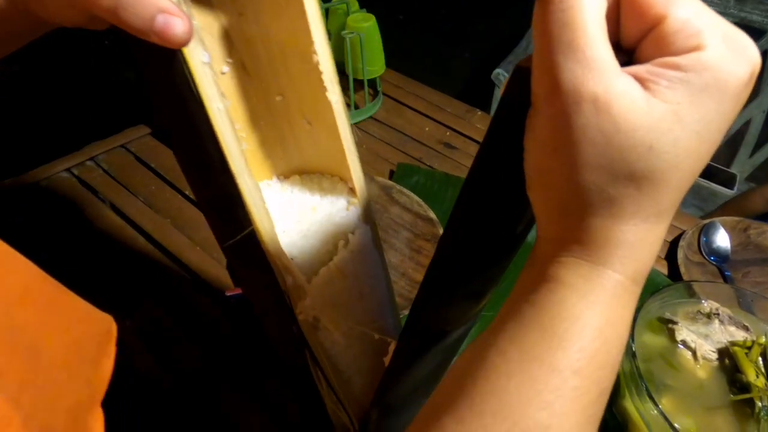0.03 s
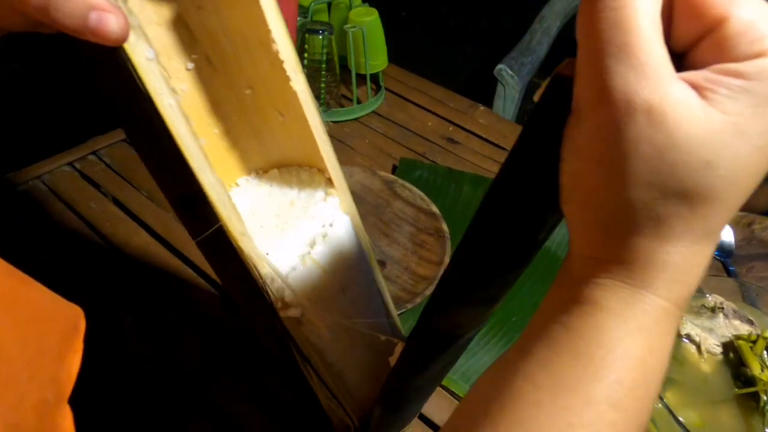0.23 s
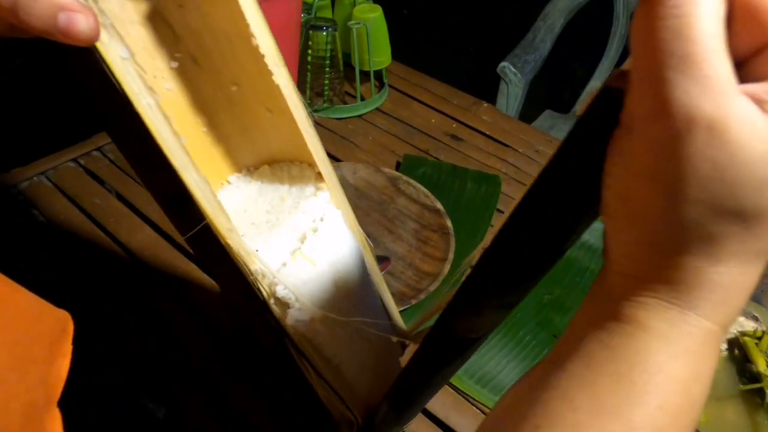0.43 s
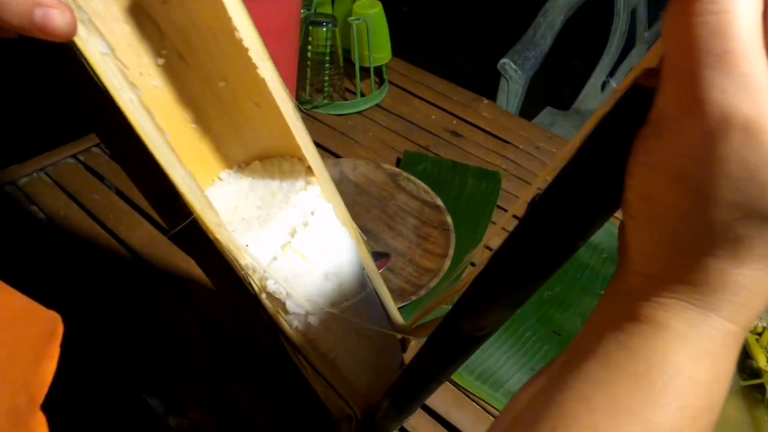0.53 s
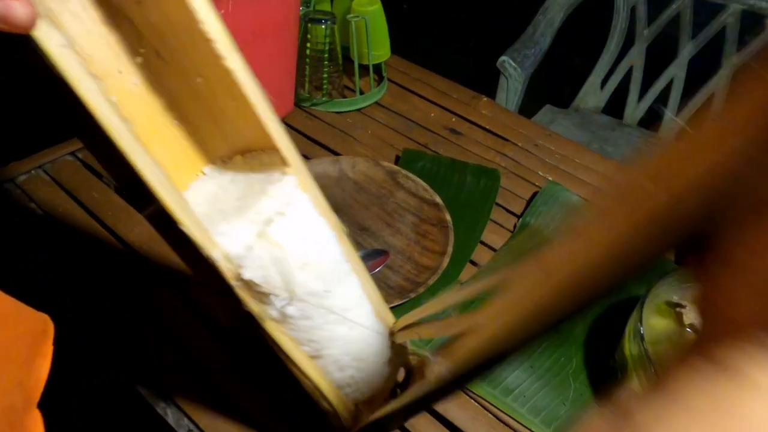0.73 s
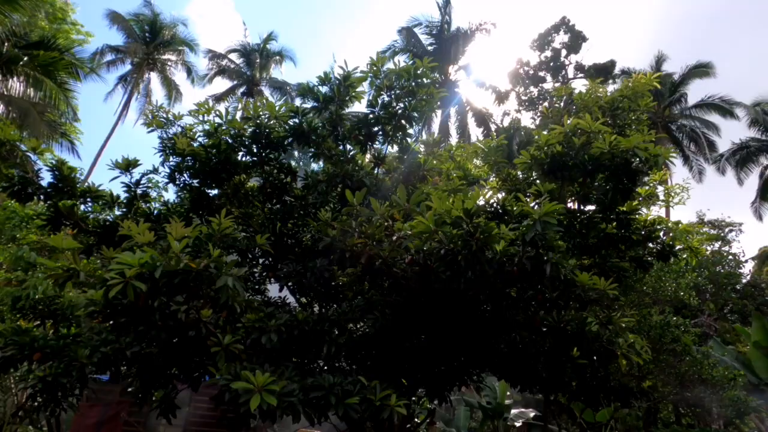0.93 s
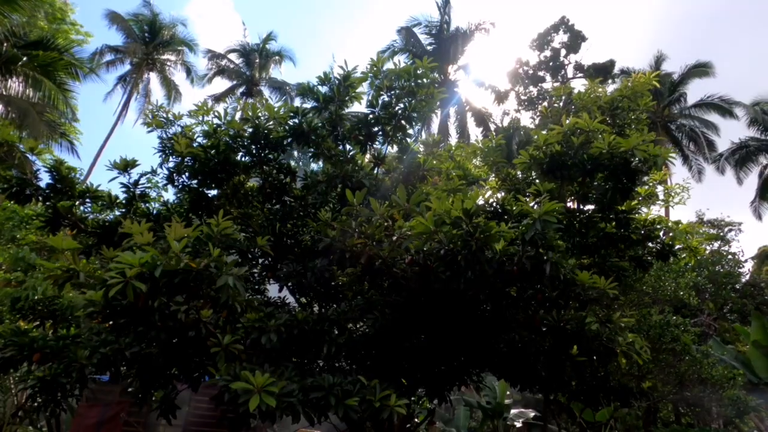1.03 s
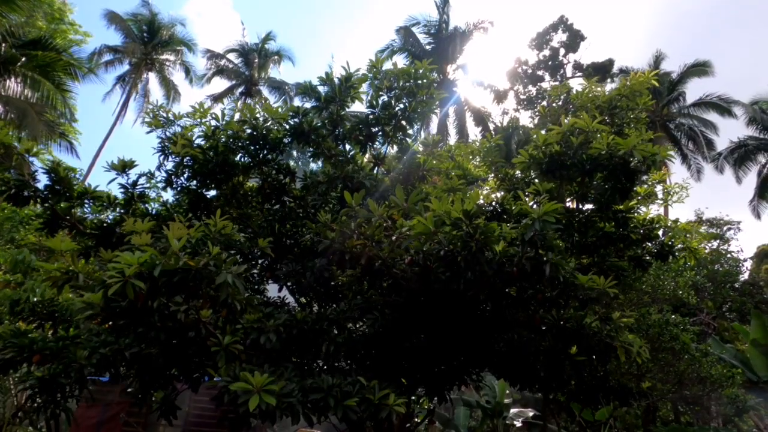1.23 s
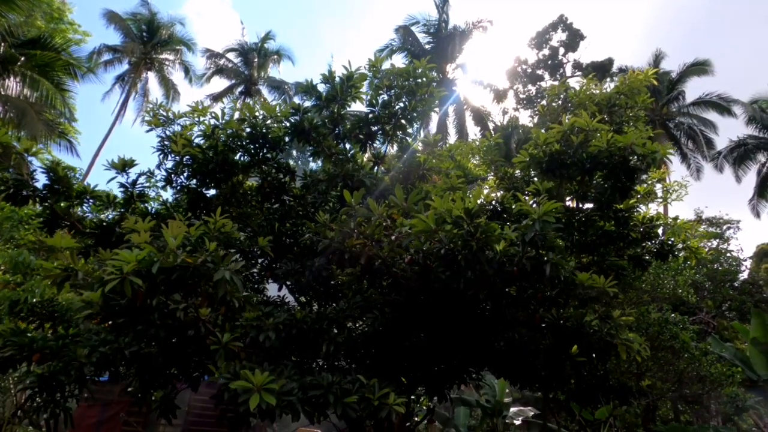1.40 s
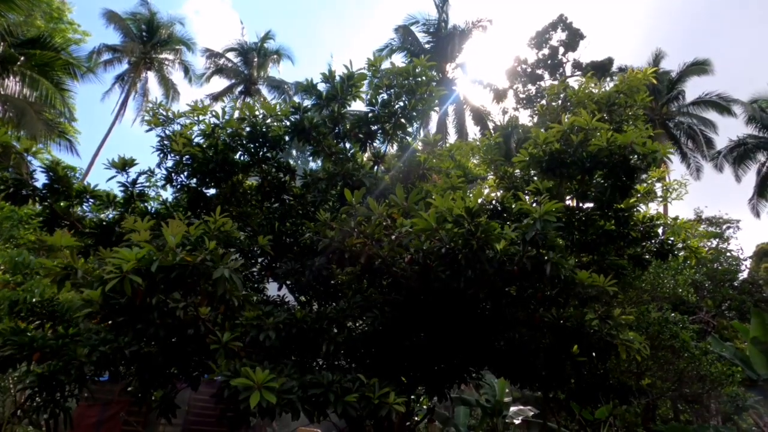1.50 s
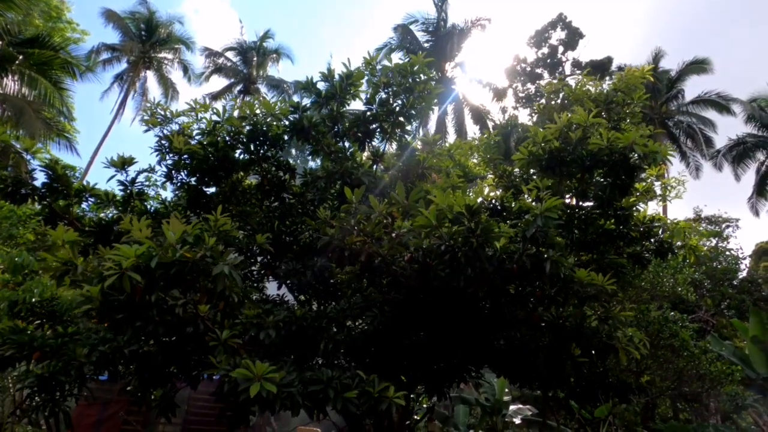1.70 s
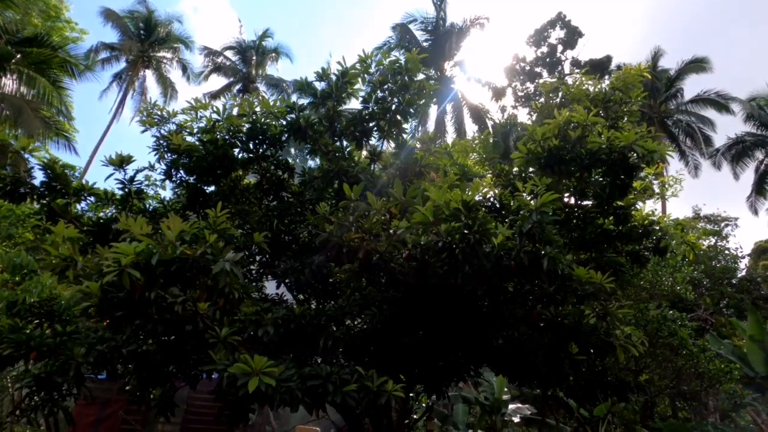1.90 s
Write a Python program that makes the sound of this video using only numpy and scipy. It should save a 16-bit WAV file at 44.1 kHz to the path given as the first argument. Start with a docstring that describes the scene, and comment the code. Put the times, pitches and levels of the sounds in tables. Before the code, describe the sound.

A bamboo tube is pulled open close to the microphone, crackling and splitting sharply until it gives with a dull knock, over insects and a distant motor hum. Then, in a quiet garden, a bird whistles and chirps twice.

```python
"""A garden table, close up: a bamboo tube is pulled open by hand. Fibres crackle, the wall splits in sharp
cracks that ring the tube, and it gives way with a dull knock, over insects and a distant motor hum.
The scene cuts to a quiet garden with light wind on the microphone. One bird nearby whistles and gives
two falling chirps, while a smaller one keeps chipping farther off in the trees."""
import sys
import numpy as np
from scipy import signal
from scipy.fft import rfft, irfft
from scipy.io import wavfile
from scipy.ndimage import uniform_filter1d

SR = 44100
rng = np.random.default_rng(int(sys.argv[2]) if len(sys.argv) > 2 else 0)


def wav_out(sig):
    """Save sig, one row per channel (or a flat mono array), as 16-bit PCM at SR to the path in sys.argv[1]."""
    wavfile.write(sys.argv[1], SR, np.round(np.clip(np.atleast_2d(sig).T, -1, 1) * 32767).astype(np.int16))


N = 85995

# air around the table: frequency_hz, relative_db
TABLE_AIR_COLOUR = [(20, 0), (60, 2), (160, 0), (300, -14), (800, -25), (2700, -25.5), (6000, -30.5),
                    (16000, -47.5)]
# distant motor: pitch_hz, level_db
MOTOR_TONES = [(58.5, -41.5), (115.5, -44.5)]
# insect chorus: pitch_hz, width_hz, level_db
INSECT_BANDS = [(3500, 150, -46.5), (5020, 175, -46.5), (7130, 250, -57)]
# air of the quiet garden: frequency_hz, relative_db
GARDEN_AIR_COLOUR = [(35, 6), (90, 1.5), (200, -13), (420, -22.5), (900, -16), (3500, -22), (8400, -35)]
# that air fading in: time_s, level_db
GARDEN_FADE = [(.978, -83), (1.22, -60.5), (1.45, -55), (1.8, -53)]
# faint hum in the garden: pitch_hz, level_db
GARDEN_TONES = [(180, -79)]
# small bird farther off: start_s, level_db, following_pip_hz
FAR_CHIPS = [(1.246, -59, 5730), (1.372, -59.5, 5900), (1.48, -56, 5730), (1.574, -45, 5930),
             (1.696, -46.5, 5700), (1.807, -42.5, 5780), (1.934, -39, 5500)]
# thin glides of other birds: start_s, length_s, from_hz, to_hz, level_db
FAR_GLIDES = [(1.342, 0.061, 3490, 2840, -60.5), (1.568, .1, 2540, 2970, -61.5),
              (1.894, 0.039, 5150, 5400, -52)]
# near bird's whistle: time_s, pitch_hz, level_db
WHISTLE_NOTE = [(1.41, 2720, -62.5), (1.44, 2570, -44), (1.466, 2554, -29), (1.494, 2516, -28.5),
                (1.508, 2555, -43), (1.526, 2518, -30.5), (1.57, 2556, -47.5), (1.64, 2480, -70)]
# its short lead-in note: time_s, pitch_hz, level_db
LEAD_IN_NOTE = [(1.668, 2425, -53), (1.678, 2455, -31), (1.685, 2370, -33.5), (1.69, 2630, -20),
                (1.694, 2655, -41.5), (1.703, 2490, -31.5), (1.714, 2480, -75.5)]
# its falling chirps: start_s, level_db
NEAR_CHIRPS = [(1.7058, -19), (1.756, -26.5)]
# chirp harmonics, from the second up: relative_db
CHIRP_HARMONICS = [-40, -32, -41.5]
# fine fibres tearing: time_s, level_db
TEAR_LEVEL = [(0, -65), (.22, -37.5), (.3, -44), (.36, -49.5), (.4, -33.5), (.47, -38), (.63, -45),
              (.66, -35.5), (.71, -30), (.76, -26), (.79, -32), (.832, -25.5), (.848, -43), (.9, -74)]
# colour of the fibres: frequency_hz, relative_db
FIBRE_COLOUR = [(60, -14.5), (300, -0.5), (2000, 0), (3300, 4), (5000, -2.5), (12000, -7.5), (16000, -22)]
# splits of the wall: time_s, level_db, bass_db, treble_db, splinter_hz
WALL_SPLITS = [(.079, -42.5, -2, -6, 1525), (.195, -39.5, -2, -2.5, 2010), (.215, -39.5, 0.5, -4, 1750),
               (0.233, -38, -10.5, 7, 2930), (0.2507, -34, -2, 2, 3130), (0.255, -29.5, 2.5, 7.5, 1010),
               (0.2925, -20, 1.5, -3, 2450), (0.3826, -29, -3.5, -7.5, 2720),
               (0.3911, -29.5, 2.5, 5.5, 2130), (0.3998, -28.5, -13, -1.5, 2510),
               (0.4128, -21.5, 6.5, 2, 2480), (0.4474, -33.5, 5, 7, 3130), (0.525, -39.5, -5.5, 6.5, 3590),
               (0.5511, -39, 3.5, 2.5, 3340), (0.604, -29.5, -9.5, 0.5, 3800), (.618, -37, -6, 1.5, 3800),
               (0.6415, -33.5, -6.5, 5, 3200), (.651, -28, -5, 3.5, 1710), (0.6923, -35.5, -2.5, -2, 3280),
               (.706, -27, -6, 2, 3800), (0.7215, -36, -1.5, 6.5, 2930), (0.7312, -27, -0.5, -1, 3680),
               (0.7341, -20, 3.5, 5.5, 1180), (0.7476, -23.5, 1.5, -1, 1970), (.765, -30, -8.5, -1.5, 4470),
               (0.77, -19, 1.5, -3.5, 1730), (.774, -25, 6, -11, 838), (0.806, -36, -5, 17.5, 3320),
               (.828, -36, 2.5, 7, 3306)]
# colour of a crack: frequency_hz, relative_db
WOOD_COLOUR = [(150, -19.5), (400, -4.5), (900, -1.5), (1400, 3.5), (2080, -9), (2650, 4.5), (3700, -1),
               (4800, -9.5), (8200, -7.5), (9200, -12.5), (16000, -31)]
# ring of the tube: pitch_hz, relative_db, t60_s
TUBE_MODES = [(438, -36.5, .07), (866, -33.5, 0.046), (2645, -28.5, 0.023), (3170, -34, 0.053),
              (3570, -32.5, .06)]
# stereo width of the bamboo: frequency_hz, side_db
BAMBOO_WIDTH = [(300, -18.5), (2500, -33.5), (6000, -15.5), (15000, -1)]

CUT_S, GARDEN_START_S = 0.9168, .978
GARDEN_TOP_HZ, BAND_LIMIT_HZ = 8490, 16300
GARDEN_T60_S, LEAVES_T60_S, TABLE_T60_S = 0.66, 0.1, 0.08
CHIP_TOP_HZ, CHIP_END_HZ, CHIP_S = 5600, 3900, .021
PIP_AFTER_S, PIP_S, PIP_RELATIVE_DB = 0.024, 0.023, -13
CHIRP_TOP_HZ, CHIRP_FLOOR_HZ, CHIRP_FALL_S, CHIRP_S = 3500, 1602, .0125, 0.026
FIBRES_PER_S, FIBRE_SPREAD_DB, FIBRE_CLUMP_DB = 7000, 2.5, 4.6
FIBRE_LOW_HZ, FIBRE_HIGH_HZ, FIBRE_DECAY_CYCLES = 250, 15000, 1.4
BASS_SHELF_HZ, TREBLE_SHELF_HZ = 1430, 4830
SPLINTER_DB, SPLINTER_OCTAVES = 9.5, 0.077


def amp(db):
    """Decibels to gain."""
    return 10 ** (np.asarray(db) / 20)


def unit_rms(x):
    """Scales to rms 1."""
    return x / np.sqrt(np.mean(x ** 2) + 1e-20)


def clock(size=N):
    """Time in seconds."""
    return np.arange(size) / SR


def curve(points):
    """Joins (time_s, value) points over the whole scene."""
    return np.interp(clock(), *np.transpose(points))


def colour_at(points, hz):
    """Joins (frequency_hz, value) points on a log axis."""
    f, value = np.transpose(points)
    return np.interp(np.log(hz + 1), np.log(f + 1), value)


def add(mix, start_s, sound):
    """Mixes a sound in at a time."""
    part = mix[max(round(start_s * SR), 0):][:len(sound)]
    part += sound[:len(part)]


def click(colour_db, size=1024):
    """A click with the given spectrum and no sound before its onset."""
    log_gain = np.log(amp(colour_db(abs(np.fft.fftfreq(size, 1 / SR)))))
    return np.fft.ifft(np.exp(np.conj(signal.hilbert(log_gain)))).real


def noise(colour_db):
    """Steady noise of the given spectrum, at rms 1."""
    gain = amp(colour_db(np.fft.rfftfreq(N, 1 / SR)))
    return unit_rms(irfft(rfft(rng.standard_normal(N)) * gain, N))


def wander(size):
    """Random drift of rms 1, smoothed over size samples."""
    return unit_rms(uniform_filter1d(rng.standard_normal(N), size))


def whitened(x, bins):
    """Evens out the spectrum, keeping only detail finer than the given bins."""
    spectrum = rfft(x)
    return irfft(spectrum / np.sqrt(uniform_filter1d(abs(spectrum) ** 2, bins)), len(x))


def tone(hz):
    """A pure voice of rms 1 that follows a pitch curve."""
    return np.sqrt(2) * np.sin(2 * np.pi * np.cumsum(hz) / SR)


def stereo(mid, side):
    """Left and right from mid and side."""
    return np.array([mid + side, mid - side])


def tail(x, t60_s, size=20000):
    """Diffuse reflections dying away."""
    t = clock(size)
    taps = rng.standard_normal(size) * amp(-60 * t / t60_s) * (t > .003)
    return signal.fftconvolve(x, taps / np.linalg.norm(taps))[:N]


def hum(tones):
    """Steady low tones."""
    return sum(np.sqrt(2) * amp(db) * np.sin(2 * np.pi * (hz * clock() + rng.random()))
               for hz, db in tones)


def air_push(start_s, db, hz, rise_s, decay_s):
    """A low, toneless push of air."""
    t = np.maximum(clock() - start_s, 0)
    envelope = np.minimum(t / rise_s, 1) * np.exp(-np.maximum(t - rise_s, 0) / decay_s)
    return amp(db) * envelope * noise(lambda f: -10 * np.log10(1 + (f / hz - hz / (f + 1)) ** 4))


def insects(drift_hz=90):
    """A chorus of narrow noise bands, each wandering in pitch."""
    chorus = np.zeros(N)
    for hz, width_hz, db in INSECT_BANDS:
        carrier = tone(hz + drift_hz * wander(size=3000))
        chorus += amp(db) * carrier * noise(lambda f: -20 * np.log10(1 + (f / width_hz) ** 2 / 2))
    return chorus


def table_ambience(air_db=-39.5):
    """Insects, rumbling air and a distant motor, all dead centre."""
    return insects() + amp(air_db) * noise(lambda f: colour_at(TABLE_AIR_COLOUR, f)) + hum(MOTOR_TONES)


def garden_ambience(side_treble_db=-14, wind_hz=450):
    """Light wind, different at each microphone port, fades in with the far hush over a faint hum."""
    mid = noise(lambda f: colour_at(GARDEN_AIR_COLOUR, f))
    side = noise(lambda f: colour_at(GARDEN_AIR_COLOUR, f)
                 + side_treble_db * f ** 2 / (f ** 2 + wind_hz ** 2))
    bed = amp(curve(GARDEN_FADE)) * stereo(mid, 0.63 * side) + hum(GARDEN_TONES)
    # one light gust touches both ports
    gust = [air_push(start_s=1.172, db=-43, hz=136, rise_s=0.042, decay_s=0.031) for _ in range(2)]
    return bed + np.array(gust)


def hiss_swell(peak_s, db, hz, swell_s, half_width_hz=750):
    """A soft band of hiss that swells to its peak and fades."""
    band = noise(lambda f: -20 * np.log10(1 + (abs(f - hz) / half_width_hz) ** 10))
    return amp(db) * np.exp(-abs(clock() - peak_s) / swell_s) * band


def far_birds(roughness=0.28, chip_hiss_db=-8, wet_db=-11.5):
    """Chips, each followed by a pip, thin glides and a swelling chatter, deeper in the trees."""
    chips = [(s, CHIP_S, CHIP_TOP_HZ, CHIP_END_HZ, db) for s, db, _ in FAR_CHIPS]
    pips = [(s + PIP_AFTER_S, PIP_S, hz, hz, db + PIP_RELATIVE_DB) for s, db, hz in FAR_CHIPS]
    calls = np.zeros(N)
    for start_s, length_s, from_hz, to_hz, db in chips + pips + FAR_GLIDES:
        progress = np.arange(0, length_s, 1 / SR) / length_s
        pitch_hz = from_hz * (to_hz / from_hz) ** progress
        add(calls, start_s, amp(db) * np.sin(np.pi * progress) * tone(pitch_hz))
    calls *= 1 + roughness * wander(size=160)
    for start_s, db, _ in FAR_CHIPS:  # soft hiss around each chip
        calls += hiss_swell(start_s + CHIP_S / 2, db + chip_hiss_db, hz=4800, swell_s=CHIP_S)
    calls += hiss_swell(peak_s=1.948, db=-38.5, hz=4200, swell_s=0.0099)  # the chatter
    return calls + amp(wet_db) * tail(calls, t60_s=0.1)


def whistle(points):
    """A pure note gliding smoothly in pitch and level."""
    time_s, hz, db = np.transpose(points)
    t = clock()
    pitch_hz = uniform_filter1d(np.interp(t, time_s, hz), size=130)
    sounding = (t > time_s[0]) * (t < time_s[-1])
    level = uniform_filter1d(amp(np.interp(t, time_s, db)) * sounding, size=130)
    return level * tone(pitch_hz)


def chirp(swell=0.42, waver=0.026, rasp_db=-19.5, flutter_hz=645, attack_s=0.0035):
    """A note that plunges and flattens, wavering, with a rasp in the voice."""
    t = np.arange(0, CHIRP_S, 1 / SR)
    flutter = lambda: noise(lambda f: -10 * np.log10(1 + (f / flutter_hz) ** 4))[:len(t)]
    plunge_hz = CHIRP_FLOOR_HZ + (CHIRP_TOP_HZ - CHIRP_FLOOR_HZ) * np.exp(-t / CHIRP_FALL_S)
    pitch_hz = plunge_hz * (1 + waver * flutter())
    voice = tone(pitch_hz) * (1 + amp(rasp_db) * flutter())
    voice += sum(amp(db) * tone(k * pitch_hz) * flutter() for k, db in enumerate(CHIRP_HARMONICS, 2))
    return voice * np.sin(np.pi * t / CHIRP_S) ** swell * np.minimum(t / attack_s, 1)


def near_bird(whistle_wet_db=-19.5, leaves_db=-2.5, chirp_wet_db=-23.5):
    """A whistle, a lead-in, then two chirps nearby, scattered by the leaves and the garden beyond."""
    notes = whistle(WHISTLE_NOTE) + whistle(LEAD_IN_NOTE)
    chirps = np.zeros(N)
    for start_s, db in NEAR_CHIRPS:
        add(chirps, start_s, amp(db) * chirp())
    reflections = amp(whistle_wet_db) * tail(notes, GARDEN_T60_S)
    reflections += amp(leaves_db) * tail(chirps, LEAVES_T60_S)
    reflections += amp(chirp_wet_db) * tail(chirps, GARDEN_T60_S)
    return notes + chirps + reflections


def tube_knock(start_s=.777, db=-18, hz=90, decay_s=.013):
    """The tube gives way with a dull knock that rumbles on."""
    t = np.maximum(clock() - start_s, 0)
    knock = amp(db) * np.exp(-t / decay_s) * np.sin(2 * np.pi * hz * t)
    return knock + air_push(start_s=.78, db=-37, hz=95, rise_s=0.0067, decay_s=0.2)


def fibres(pitch_count=30):
    """Fibres snap in clumps, each ringing briefly at its own pitch; the fine, high ones snap most."""
    clumps_db = FIBRE_CLUMP_DB * np.minimum(wander(size=130), 2)
    t, crackle = clock(size=1024), np.zeros(N)
    pitches = np.geomspace(FIBRE_LOW_HZ, FIBRE_HIGH_HZ, pitch_count)
    for hz in pitches:
        snaps_per_s = FIBRES_PER_S * hz / pitches.sum()
        snaps = (rng.random(N) < snaps_per_s / SR) * rng.choice([-1, 1], N)
        strength = amp(clumps_db + FIBRE_SPREAD_DB * np.minimum(rng.exponential(1, N), 2))
        ring = unit_rms(np.exp(-t * hz / FIBRE_DECAY_CYCLES) * np.cos(2 * np.pi * hz * t))
        crackle += signal.fftconvolve(snaps * strength, ring)[:N]
    crackle = signal.fftconvolve(crackle, click(lambda f: colour_at(FIBRE_COLOUR, f)))[:N]
    return unit_rms(crackle) * amp(curve(TEAR_LEVEL))


def crack(db, bass_db, treble_db, splinter_hz, size, rise_s=0.00022, decay_s=0.0021, creak_db=-22):
    """Fibres creak, then break in a quick run, coloured by the wood and the splinter."""
    break_at = size // 4
    t = clock(size) - break_at / SR
    build_up = np.exp(-abs(t / rise_s)) + amp(creak_db) * np.exp(-abs(t / decay_s) / 2)
    run = rng.standard_normal(size) * np.where(t < 0, build_up, np.exp(-abs(t / decay_s)))
    run[break_at] += 1.1  # the snap itself
    bass = lambda f: bass_db / (1 + (f / BASS_SHELF_HZ) ** 4)
    treble = lambda f: treble_db * (1 - 1 / (1 + (f / TREBLE_SHELF_HZ) ** 4))
    splinter = lambda f: SPLINTER_DB / (1 + (np.log2((f + 1) / splinter_hz) / SPLINTER_OCTAVES) ** 2)
    wood = click(lambda f: colour_at(WOOD_COLOUR, f) + bass(f) + treble(f) + splinter(f))
    return amp(db) * unit_rms(signal.fftconvolve(whitened(run, bins=7), wood)[:size])


def bamboo(ring_db=-16, table_wet_db=-16, crack_size=1024):
    """Close up, cracks and fibres ring the tube and bounce off the table; only their treble is wide."""
    tearing = fibres()
    creak_s = crack_size // 4 / SR
    for time_s, db, bass_db, treble_db, splinter_hz in WALL_SPLITS:
        add(tearing, time_s - creak_s, crack(db, bass_db, treble_db, splinter_hz, crack_size))
    t = clock(size=4096)
    ring = sum(amp(db - 60 * t / t60_s) * np.cos(2 * np.pi * hz * t) for hz, db, t60_s in TUBE_MODES)
    direct = tearing + amp(ring_db) * signal.fftconvolve(tearing, ring)[:N]
    width = amp(colour_at(BAMBOO_WIDTH, np.fft.rfftfreq(N, 1 / SR)))
    side = irfft(1j * rfft(direct) * width, N)  # a quarter-cycle shift keeps left and right equally loud
    return stereo(direct + amp(table_wet_db) * tail(direct, TABLE_T60_S), side)


def scene():
    """The table, a moment of silence at the cut, then the duller-sounding garden."""
    t = clock()
    garden = (garden_ambience() + near_bird() + far_birds()) * (t > GARDEN_START_S)
    lowpass = signal.ellip(8, .5, 60, GARDEN_TOP_HZ, fs=SR, output="sos")
    table = (bamboo() + tube_knock() + table_ambience()) * (t < CUT_S)
    return table + signal.sosfilt(lowpass, garden)


def record(dry):
    """The recorder clips at full scale, then limits the band."""
    lowpass = signal.firwin(511, BAND_LIMIT_HZ, window=("kaiser", 9), fs=SR)
    return signal.oaconvolve(np.clip(dry, -1, 1), lowpass[None], "same")


dry = scene()
out = record(dry)
wav_out(out)
```